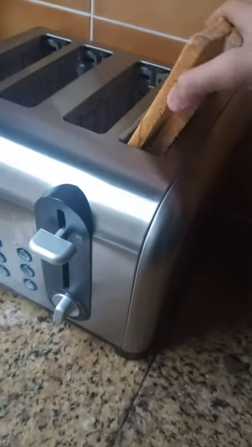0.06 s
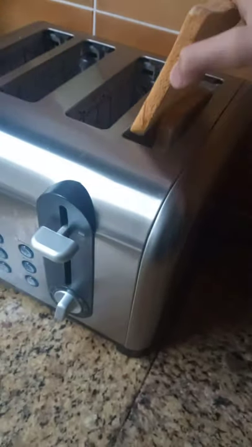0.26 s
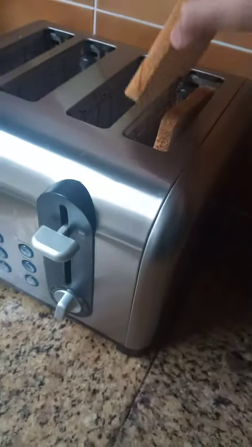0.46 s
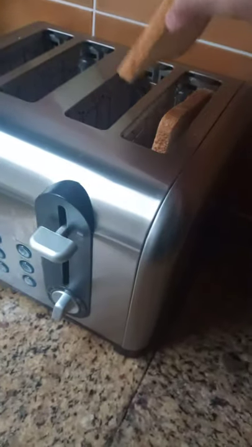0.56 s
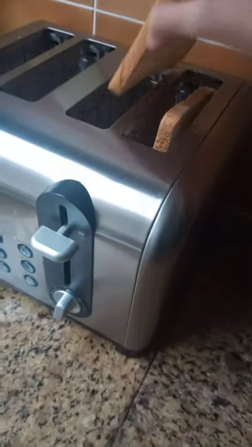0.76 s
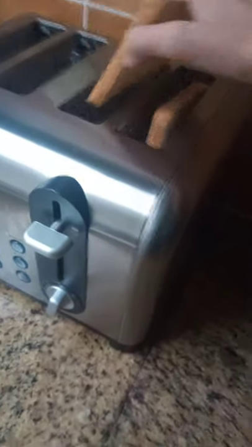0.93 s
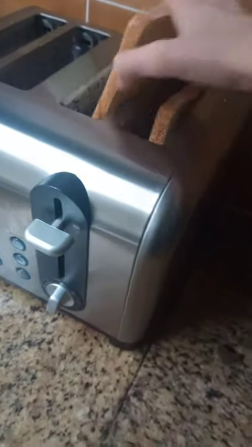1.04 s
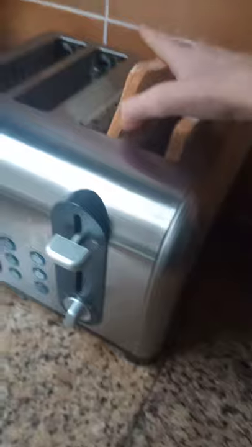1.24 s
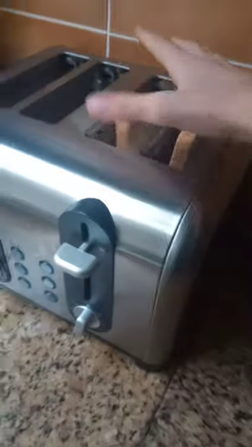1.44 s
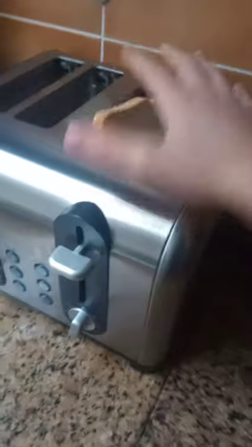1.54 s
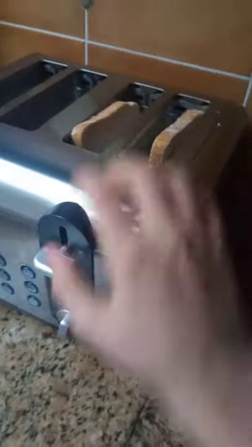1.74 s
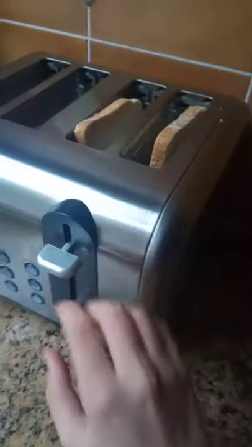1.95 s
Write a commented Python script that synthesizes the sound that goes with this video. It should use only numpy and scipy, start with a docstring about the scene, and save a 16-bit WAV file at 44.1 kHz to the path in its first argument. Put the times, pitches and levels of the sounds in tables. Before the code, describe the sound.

Close by, two crusty bread slices knock into a steel toaster. The first scrapes and lands with a sharp, hollow clunk; the second follows with quieter taps and wiry rattling. The kitchen adds a short echo and faint hum.

```python
"""Loading a toaster.

Two slices of crusty bread go into a steel toaster, close by in a small kitchen. The first judders
down the edge of its slot and lands on the wire carriage; the second bumps, scrapes and rattles in.
Contacts ring the steel shell and its wires; tiled walls answer briefly over a faint hum."""
import sys
import numpy as np
from scipy import signal
from scipy.fft import rfft, irfft
from scipy.io import wavfile

SR = 44100
rng = np.random.default_rng(int(sys.argv[2]) if len(sys.argv) > 2 else 0)


def store_pcm(level_fs):
    """Save levels as 16-bit WAV."""
    pcm = np.round(np.clip(level_fs, -1, 1) * 32767).astype(np.int16)
    wavfile.write(sys.argv[1], SR, np.atleast_2d(pcm).T)


N = 88200

# bread and wire guides striking: (time [s], thump [dB], knock [dB], clack [dB], tick [dB])
HITS = [(0.1, -89, -89, -78, -68.5), (0.182, -90.5, -90.5, -73.5, -76.5), (0.207, -70.5, -80.5, -91, -69.5),
        (0.225, -73, -61, -60, -70.5), (0.331, -45.5, -37, -44, -44), (0.340, -60, -46.5, -49, -43),
        (0.348, -37, -37.5, -47.5, -39.5), (0.360, -49, -48.5, -37.5, -60), (0.573, -61, -94, -65, -68),
        (0.893, -55.5, -66, -70.5, -89.5), (0.908, -56, -58, -71, -99.5), (1.049, -54.5, -62, -68.5, -73),
        (1.110, -61.5, -60.5, -57, -60.5), (1.22, -59.5, -82, -63.5, -73.5), (1.417, -62, -51, -51, -56),
        (1.421, -58.5, -49, -50.5, -48.5), (1.443, -72, -65, -59, -45.5), (1.535, -78, -55, -57, -57),
        (1.542, -72, -54, -49.5, -47.5), (1.559, -73, -47.5, -51.5, -44), (1.577, -59, -52, -46.5, -53),
        (1.604, -56.5, -59.5, -60.5, -63.5), (1.698, -59, -67, -57.5, -53), (1.731, -70, -68, -53.5, -50),
        (1.736, -72.5, -56.5, -67, -53), (1.744, -57.5, -57.5, -56, -62), (1.767, -60, -53, -63, -81)]
# crust sliding on metal: (time [s], length [s], thump, knock, clack, tick [dB re SCRAPE_DB])
SCRAPES = [(0.213, 0.1, -58, -59, -62.5, -76), (0.336, 0.067, -56.5, -47, -50, -70),
           (0.411, 0.13, -63, -70.5, -65.5, -75.5), (1.017, 0.017, -66, -82, -77, -79),
           (1.049, 0.045, -66, -70.5, -71.5, -73), (1.222, 0.06, -69.5, -65.5, -64.5, -72.5),
           (1.252, 0.17, -67, -75, -83, -120), (1.373, 0.064, -82, -83, -64.5, -72),
           (1.419, 0.049, -73, -53, -50.5, -56), (1.486, 0.038, -53.5, -55.5, -56.5, -75),
           (1.535, 0.056, -73, -58.5, -67, -55), (1.62, 0.097, -75, -60.5, -67.5, -80),
           (1.759, 0.1, -75.5, -67.5, -74.5, -80)]
# first slice jerking along the slot's edge: (time [s], judder [dB], rasp [dB])
SLIPS = [(0.233, -34.5, -53), (0.244, -48.5, -75), (0.265, -58.5, -55), (0.276, -51, -70.5),
         (0.29, -51, -70.5), (0.3005, -39, -50.5), (0.309, -54, -57.5)]
# limits of the thump, knock, clack and tick bands: (frequency [Hz])
CONTACT_EDGES_HZ = [60, 300, 800, 3100, 8200]
# shell, carriage and wires: (frequency [Hz], level [dB], t60 [s])
TOASTER_MODES = [(74, -29.5, 0.37), (137.5, -24, 0.25), (231.2, -20, 0.16), (267, -14.5, 0.043),
                 (339, -24.5, 0.38), (390.3, -38.5, 0.93), (446, -27, 0.2), (622.4, -30, 0.31),
                 (851, -40.5, 0.2), (967, -32.5, .3), (1157, -28, 0.28), (1797, -23, 0.13),
                 (2030, -33.5, 0.09), (2124, -26.5, 0.11), (2093, -27.5, 0.16), (2303, -25, 0.15),
                 (2450, -27.5, 0.16), (2600, -24, 0.1), (3100, -26.5, 0.16), (4532, -26, 0.048),
                 (5180, -31, 0.32), (5830, -30, 0.22), (6130, -14, 0.096), (6300, -26.5, 0.18),
                 (6448, -28, 0.37), (6690, -20.5, 0.21)]
# dense ring of the sheet steel: (frequency [Hz], relative level [dB])
SHEET_SPECTRUM = [(40, -32.5), (100, -17.5), (190, 1), (330, -1), (550, -4.5), (790, -8), (950, -3.5),
                  (1200, -5), (1550, -0.5), (1850, 2.5), (2350, 0), (2750, -3), (3400, -6), (4400, -2),
                  (5500, 0), (6600, 1.5), (7300, -2), (8300, -12.5)]
# modes rung by the slips: (frequency [Hz], level [dB], t60 [s])
JUDDER_MODES = [(337, -2.5, 0.18), (448.8, -2.5, 0.12), (496, -6, 0.061), (541, -9.5, 0.044),
                (632, -11.5, 0.28), (697, -10.5, 0.18), (714, -4, 0.049), (948, -17.5, 0.052),
                (1416, -11.5, 0.038), (1706, -18, 0.14)]
# struck wires and guide plates: (time [s], frequency [Hz], level [dB], t60 [s])
WIRE_PINGS = [(0.099, 1630, -76.5, 0.16), (0.098, 3760, -68, 0.082), (0.098, 6760, -62, 0.04),
              (0.208, 1810, -64, 0.075), (0.281, 5190, -54, 0.064), (0.323, 6448, -55, 0.12),
              (0.331, 2247, -41.5, 0.087), (0.340, 2283, -34, .1), (0.342, 2682, -40, 0.072),
              (0.360, 6690, -40.5, 0.12), (0.360, 6448, -38, 0.081), (0.358, 5600, -44, 0.1),
              (0.893, 886, -66.5, 0.34), (0.893, 960, -74, 0.21), (0.896, 1408, -66.5, 0.12),
              (0.894, 2394, -66, 0.062), (1.045, 972, -69, 0.38), (1.047, 873, -69, 0.34),
              (1.111, 2450, -55, 0.12), (1.111, 955, -62, 0.15), (1.112, 2860, -59, 0.046),
              (1.114, 6270, -53.5, 0.02), (1.114, 4440, -61, 0.063), (1.221, 1430, -71, 0.28),
              (1.219, 1750, -70, 0.11), (1.417, 2700, -51, 0.088), (1.419, 2414, -44, 0.076),
              (1.419, 5490, -48, 0.087), (1.420, 5960, -42.5, 0.056), (1.437, 6950, -46, 0.063),
              (1.444, 1545, -47.5, 0.11), (1.445, 1945, -52.5, 0.074), (1.500, 2470, -52.5, 0.037),
              (1.542, 2064, -45, 0.13), (1.542, 5900, -41, 0.013), (1.562, 1662, -48, 0.11),
              (1.564, 2697, -55.5, .17), (1.577, 6260, -47, 0.049), (1.701, 5290, -52.5, 0.055),
              (1.734, 1652, -56.5, 0.15), (1.735, 6500, -47, 0.043)]
# brief low tones of casing and carriage: (time [s], hold [s], frequency [Hz], level [dB])
CASING_TONES = [(0.12, 0.022, 137.5, -62.5), (0.336, 0.019, 205, -38), (0.34, 0.0092, 348.4, -42.5),
                (0.345, 0.025, 262.6, -40.5), (0.36, 0.093, 74, -58), (0.39, 0.062, 139.6, -45.5),
                (0.896, 0.023, 339, -57), (0.914, 0.08, 76.3, -61), (0.938, 0.036, 145, -56),
                (1.023, 0.018, 326, -57), (1.026, 0.13, 259.3, -69), (1.275, 0.08, 263.4, -62),
                (1.285, 0.1, 339, -57), (1.434, 0.065, 139.7, -51), (1.561, 0.046, 338, -54.5),
                (1.61, 0.046, 139, -54.5), (1.72, 0.092, 137.6, -61.5), (1.834, 0.087, 340.3, -63.5)]
# sprung carriage after landings: (time [s], frequency [Hz], level [dB], t60 [s], beat depth [0-1])
CARRIAGE_SHIVERS = [(0.52, 2124, -65.5, 0.88, 0.6), (0.55, 1043, -77.5, 0.98, .6),
                    (0.62, 1785, -72.5, 0.31, 0.57), (0.62, 386.6, -63, 1.65, .08),
                    (0.52, 2100, -72.5, 0.55, 0.65), (0.47, 6470, -70.5, 0.62, 0.6),
                    (1.026, 2475, -69.5, 0.64, 0.52), (1.029, 4570, -75.5, .35, 0.75),
                    (1.285, 2670, -80.5, 0.52, 0.6), (1.61, 2153, -69.5, 1.1, 1),
                    (1.75, 1761, -76.5, 0.64, 0.7), (1.925, 384, -61, 0.5, .08)]
# kitchen decay: (frequency [Hz], t60 [s])
ROOM_T60 = [(100, 0.6), (500, 0.58), (2000, 0.42), (7000, 0.42)]
# background hum: (frequency [Hz], relative spectral density [dB])
HUM_SPECTRUM = [(25, -18.5), (50, 1), (78, -10), (100, -2.5), (140, 5.5), (190, -11), (350, -5.5),
                (520, -19), (1000, -23.5), (2200, -24.5), (4000, -32), (6600, -29.5), (8300, -47.5)]

CHATTER_DB, CHATTER_DECAY_S = -12.5, 0.0054  # crumbs breaking after a hit
SCRAPE_DB, SCRAPE_ATTACK_S, SCRAPE_RELEASE_S = -10, 0.0055, 0.0063
CRUMBLE_DB, CRUMBLE_DECAY_S, RASP_TREBLE_DB = -8, 0.0067, -5  # crust crumbling after a slip


def toaster(t, room, sheet_db=-2.5, sheet_t60_s=0.13, sheet_attack_s=0.001, room_db=-14):
    """Contacts ring the shell's clear modes, its sheet steel and the room."""
    sheet = amp(sheet_db) * noise(SHEET_SPECTRUM) * fade(t, sheet_t60_s) * rise(t, sheet_attack_s)
    return drive(contacts(t), ring(TOASTER_MODES, t) + sheet + amp(room_db) * room)


def contacts(t):
    """Force of hits, scrapes and slips, in four bands from thump to tick."""
    force, grit = np.zeros((4, N)), crumbs()
    chatter = amp(CHATTER_DB) * np.exp(-t[:SR // 20] / CHATTER_DECAY_S)
    for start, *db in HITS:
        i = int(start * SR)
        after = slice(i, i + len(chatter))
        force[:, i] += amp(db)
        force[2:, after] += amp(db)[2:, None] * chatter * grit[after]
    for start, length, *db in SCRAPES:
        span = slice(int(start * SR), int(start * SR) + SR // 2)
        age = np.maximum(t[span] - start, 0)
        release = np.exp(-np.maximum(age - length, 0) / SCRAPE_RELEASE_S)
        pressure = np.minimum(age / SCRAPE_ATTACK_S, 1) * release
        force[:, span] += amp(db)[:, None] * amp(SCRAPE_DB) * pressure * grit[span]
    for start, _, rasp_db in SLIPS:
        crumble = amp(CRUMBLE_DB) * (t >= start) * np.exp(-np.abs(t - start) / CRUMBLE_DECAY_S)
        rasp = impulse(start) + crumble * grit
        force[2:] += amp([rasp_db, rasp_db + RASP_TREBLE_DB])[:, None] * rasp
    return sum(band(f, lo, hi) for f, lo, hi in zip(force, CONTACT_EDGES_HZ, CONTACT_EDGES_HZ[1:]))


def crumbs(rate_per_s=800, scatter_db=6):
    """Tiny crust fractures, uneven in time and size."""
    breaks = rng.random(N) < rate_per_s / SR
    size = unit(amp(scatter_db * rng.standard_normal(N)))
    return breaks * size * rng.choice([-1., 1.], N)


def judder(t, room, attack_s=0.0012, highpass_hz=250.7, room_db=-34.5):
    """Stick-slip of the crust: a short hollow croak, no bass."""
    jerks = sum(amp(db) * impulse(start) for start, db, _ in SLIPS)
    croak = drive(jerks, ring(JUDDER_MODES, t) * rise(t, attack_s))
    croak = signal.sosfilt(signal.butter(4, highpass_hz, "high", fs=SR, output="sos"), croak)
    return croak + amp(room_db) * drive(croak, room)


def wires(t, room, roughness=0.77, flutter_hz=112.5, room_db=-45.5):
    """Struck wires ping, roughened by chatter against their guides."""
    age = t[:SR // 3]
    pings = sum(place(amp(db) * tone(age, hz, t60, roughness, flutter_hz), start)
                for start, hz, db, t60 in WIRE_PINGS)
    return pings + amp(room_db) * drive(pings, room)


def casing(t, attack_s=0.0019, release_t60_s=0.13):
    """Low hollow tones that hold briefly, then die away quickly."""
    age, out = t[:SR // 2], np.zeros(N)
    for start, hold, hz, db in CASING_TONES:
        envelope = rise(age, attack_s) * fade(np.maximum(age - hold, 0), release_t60_s)
        out += place(amp(db) * envelope * np.sin(2 * np.pi * hz * age), start)
    return out


def carriage(t, swell_s=0.017, beat_hz=21.5, flutter_hz=45.3):
    """Sprung carriage and wires shiver on; each faint tone beats with a close neighbour."""
    age, out = t[:SR], np.zeros(N)
    swell = np.minimum(age / swell_s, 1)
    for start, hz, db, t60, beat_depth in CARRIAGE_SHIVERS:
        flutter_depth = 0.93 * beat_depth
        main = tone(age, hz, t60, flutter_depth, flutter_hz)
        neighbour = beat_depth * tone(age, hz + beat_hz, t60, flutter_depth, flutter_hz)
        out += place(amp(db) * swell * (main + neighbour), start)
    return out


def kitchen(t, build_s=0.0033):
    """Steel-coloured reverberation off tiled walls, one decay per band."""
    spectrum = rfft(noise(SHEET_SPECTRUM))
    hz, t60s = np.array(ROOM_T60).T
    weights = [per_bin(list(zip(hz, row))) for row in np.eye(len(hz))]
    tail = sum(irfft(spectrum * weight, N) * fade(t, t60) for weight, t60 in zip(weights, t60s))
    return tail * rise(t, build_s)


def hum(rms_db=-74.5):
    """Faint, steady low noise."""
    return amp(rms_db) * unit(noise(HUM_SPECTRUM))


def ring(modes, t):
    """Damped modes; neighbours in opposite polarity."""
    return sum((-1) ** k * amp(db) * np.sin(2 * np.pi * hz * t) * fade(t, t60)
               for k, (hz, db, t60) in enumerate(modes))


def tone(age, hz, t60_s, depth, flutter_hz):
    """Decaying sine; level and phase flutter randomly, up to about flutter_hz."""
    lowpass = signal.butter(3, flutter_hz, fs=SR, output="sos")
    level, phase = depth * unit(signal.sosfilt(lowpass, rng.standard_normal((2, len(age)))))
    return (1 + level) * np.sin(2 * np.pi * hz * age + phase) * fade(age, t60_s)


def noise(spectrum):
    """Noise shaped by (frequency [Hz], level [dB]) points."""
    return irfft(rfft(rng.standard_normal(N)) * amp(per_bin(spectrum)), N)


def per_bin(points):
    """Interpolate (frequency [Hz], value) onto FFT bins, log axis."""
    hz, value = np.array(points, float).T
    return np.interp(np.log(np.fft.rfftfreq(N, 1 / SR) + 1), np.log(hz), value)


def band(x, lo_hz, hi_hz):
    """Band-pass keeping white-noise power."""
    bandpass = signal.butter(4, [lo_hz, hi_hz], "band", fs=SR, output="sos")
    return signal.sosfilt(bandpass, x + 1e-18) * np.sqrt(SR / 2 / (hi_hz - lo_hz))


def drive(force, response):
    """Convolve force with response."""
    return signal.fftconvolve(force, response)[:N]


def rise(t, attack_s):
    """Exponential onset."""
    return 1 - np.exp(-t / attack_s)


def fade(t, t60_s):
    """Exponential decay."""
    return np.exp(-np.log(1000) * t / max(t60_s, .005))


def impulse(start_s):
    """One-sample push."""
    return 1. * (np.arange(N) == int(start_s * SR))


def place(sound, start_s):
    """Delay and pad to N samples."""
    return np.concatenate([np.zeros(int(start_s * SR)), sound, np.zeros(N)])[:N]


def amp(db):
    """dB to gain."""
    return 10 ** (np.asarray(db, float) / 20)


def unit(x):
    """Scale to rms 1."""
    return x / np.sqrt(np.mean(x ** 2))


def scene():
    """Toaster and bread over the kitchen's hum, mono."""
    t = np.arange(N) / SR
    room = kitchen(t)
    return (hum() + toaster(t, room) + wires(t, room) + carriage(t) + casing(t) + judder(t, room))[None]


def record(dry):
    """Steep low-pass at 7850 Hz."""
    return signal.sosfilt(signal.ellip(8, .2, 70, 7850, fs=SR, output="sos"), dry)


dry = scene()
out = record(dry)
store_pcm(out)
```